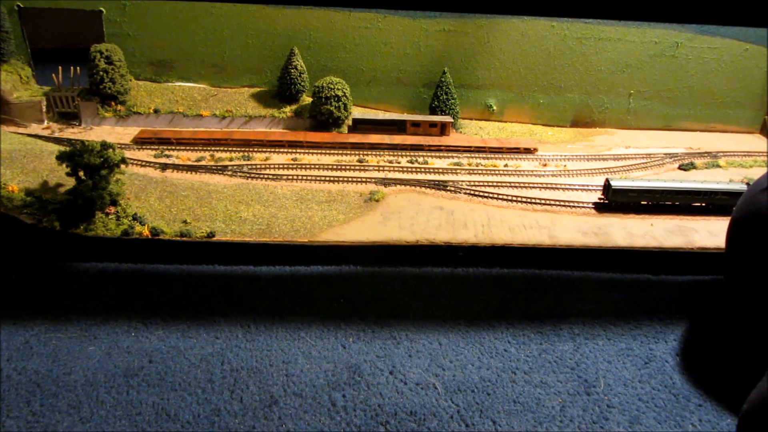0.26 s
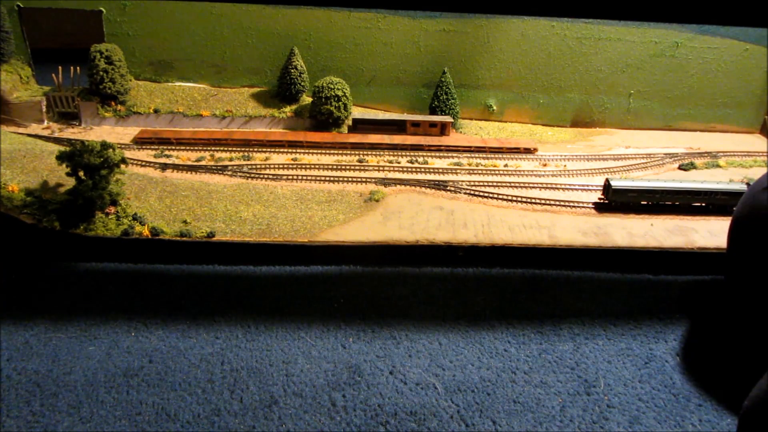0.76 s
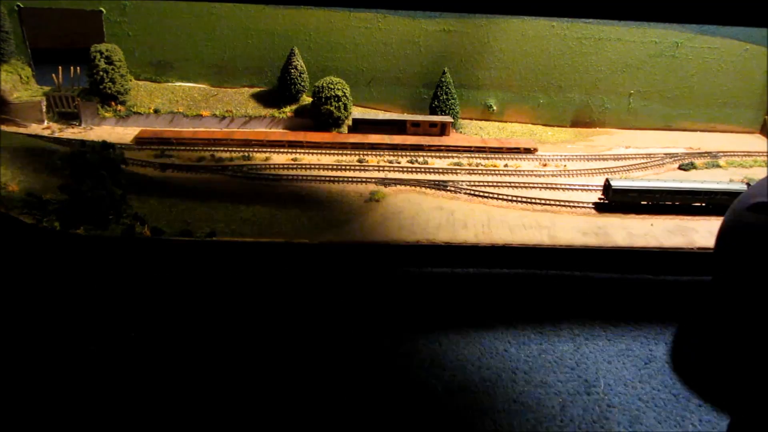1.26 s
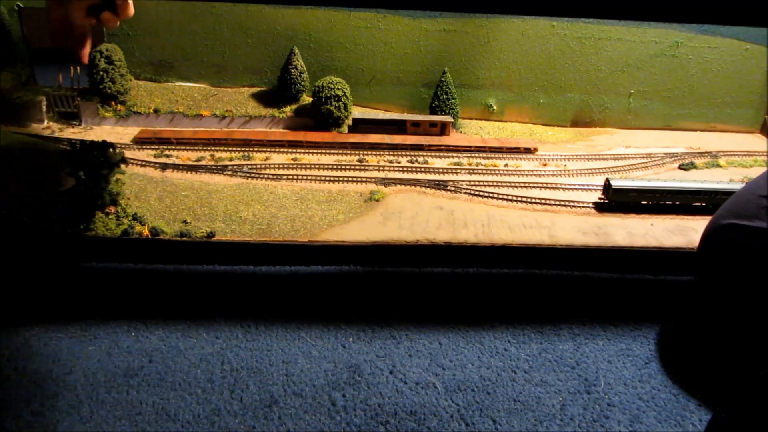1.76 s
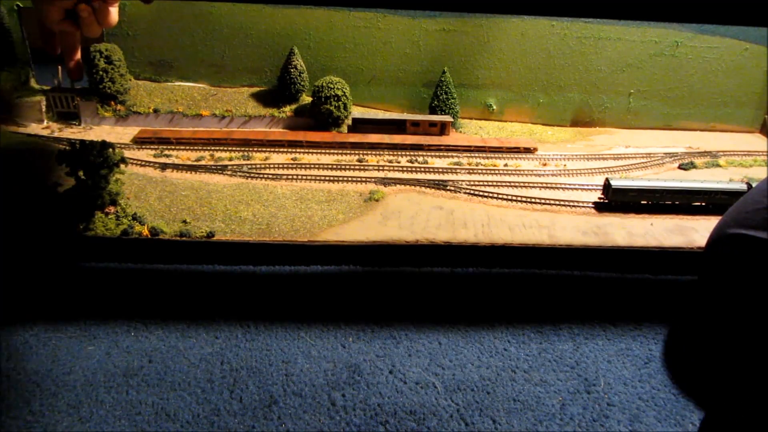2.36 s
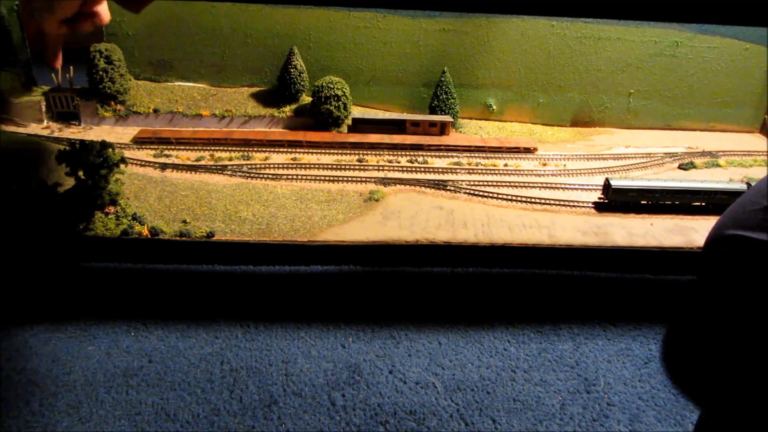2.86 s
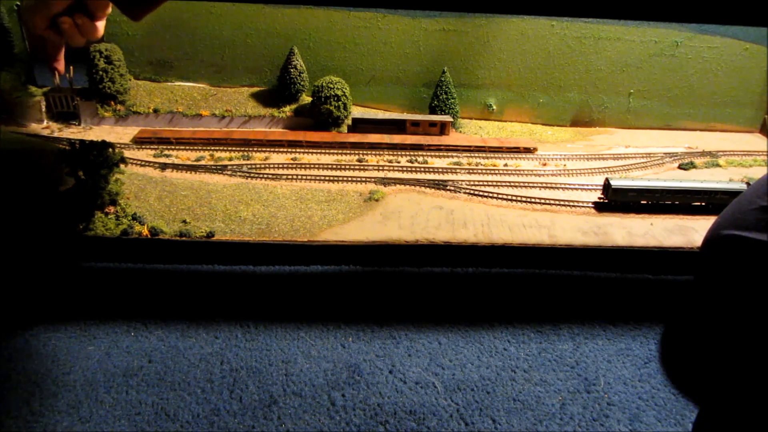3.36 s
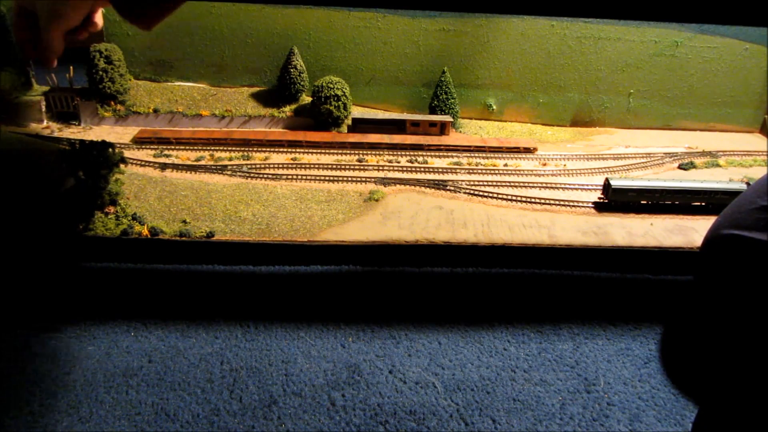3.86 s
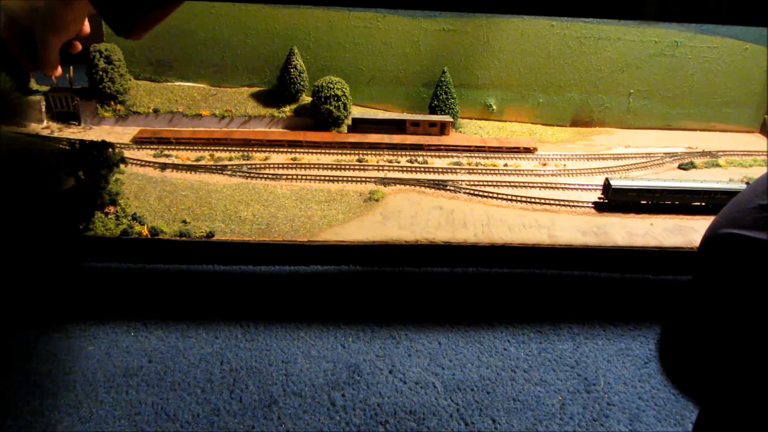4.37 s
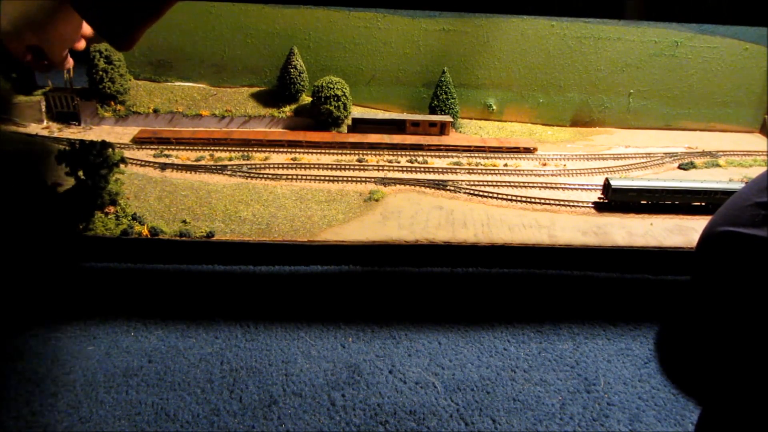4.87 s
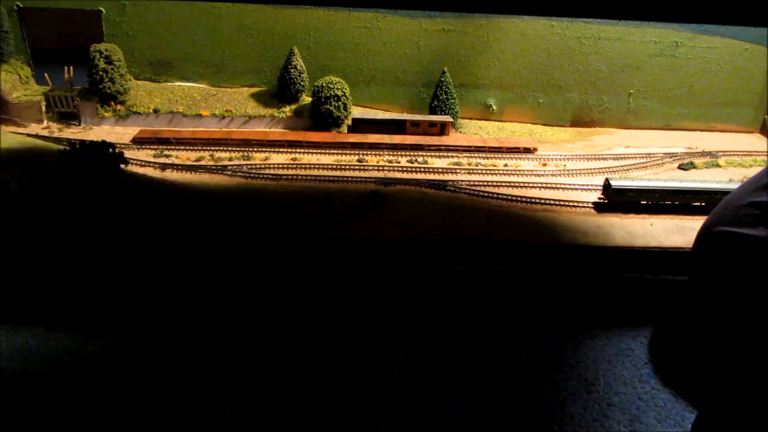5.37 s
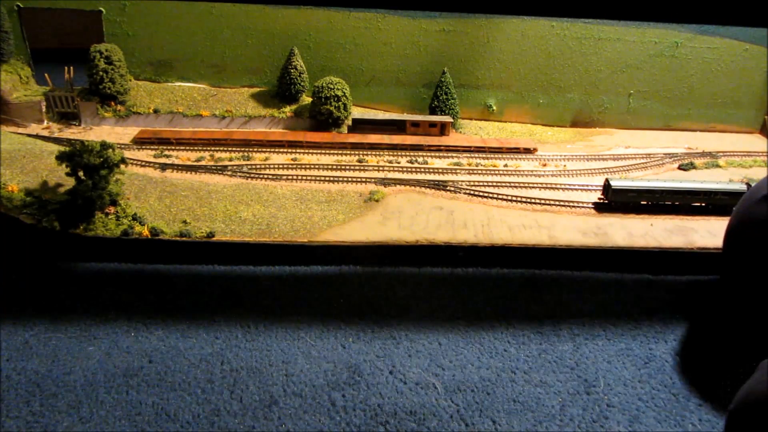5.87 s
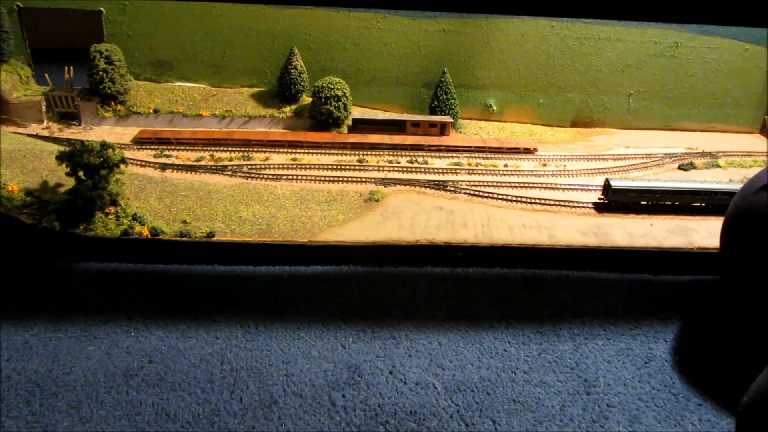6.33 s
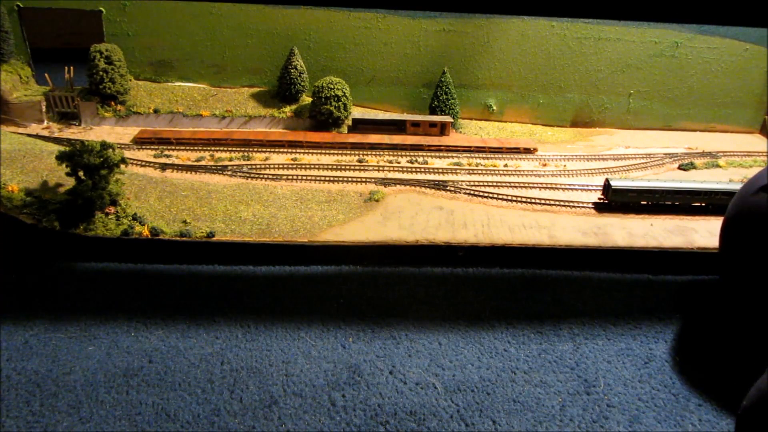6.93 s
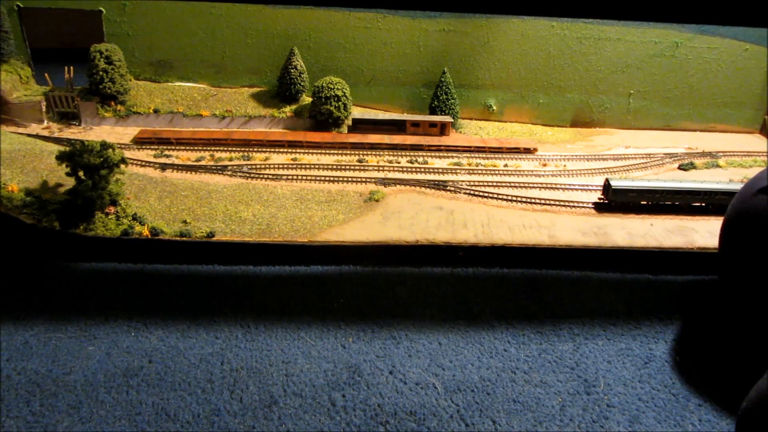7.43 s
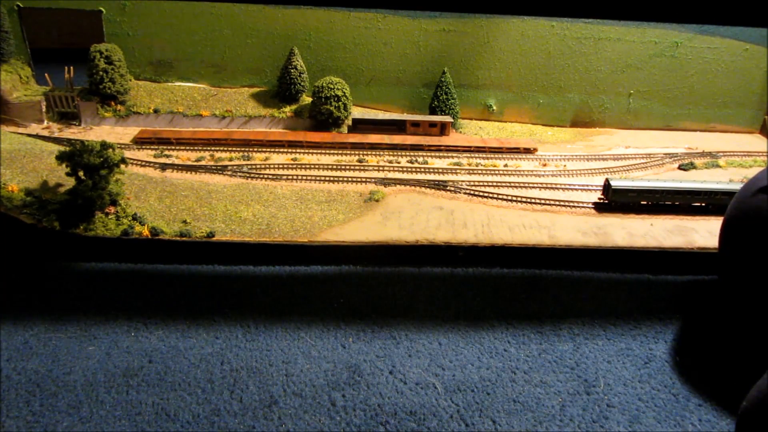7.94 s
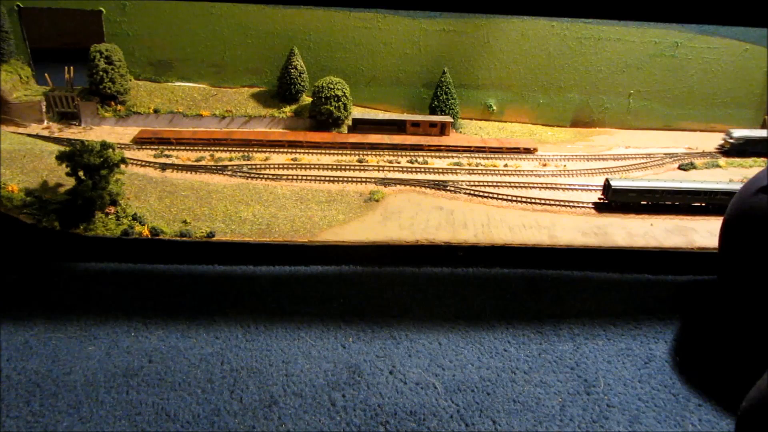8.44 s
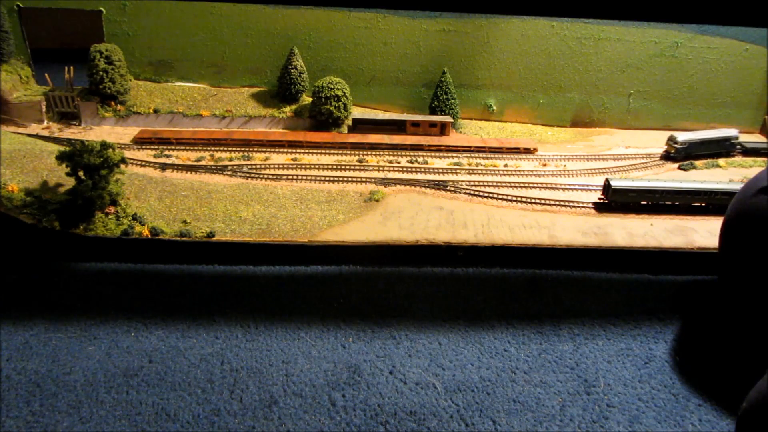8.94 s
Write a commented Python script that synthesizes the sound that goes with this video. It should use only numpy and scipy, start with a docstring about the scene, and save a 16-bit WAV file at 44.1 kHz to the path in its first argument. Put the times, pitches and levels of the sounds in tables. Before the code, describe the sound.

A small model train rolls to a stop, plastic wagons click and scrape on rails, a switch snaps, and the train rattles off again.

```python
"""In a quiet, humming room, a small model train rolls to a stop on a wooden layout. A sleeve rustles as an
arm reaches over, and plastic wagons click and scrape while they are set on the rails at the left. A point
switch snaps, and the train sets off again at the right: the board rumbles, gears whirr, wheels tick over joints.
Impacts excite decaying modes; rolling and friction are trains of random tiny contacts passed through
resonances; hum is a set of sines and hiss is shaped noise. Room reflections follow the handled and moving sources."""
import sys
import numpy as np
from scipy import signal
from scipy.fft import rfft, irfft
from scipy.io import wavfile
from scipy.ndimage import uniform_filter1d, map_coordinates

SR = 44100
rng = np.random.default_rng(int(sys.argv[2]) if len(sys.argv) > 2 else 0)


def transcribe(u):
    """Save the signal u as a 16-bit wav file named by the first command-line argument.

    u: samples, shape (n,) or (channels, n), limited to [-1, 1]; the rate is SR.
    q: integer samples, one column per channel.
    """
    v = np.clip(np.atleast_2d(u).T, -1, 1)
    q = np.round(v * 32767).astype(np.int16)
    wavfile.write(sys.argv[1], SR, q)


N = 405719
T = np.arange(N) / SR
RING_T = T[:8192]  # time axis of short sounds and impulse responses

# Room hiss, spectrum: [f/Hz, level/dB per Hz]
AIR_SPECTRUM = [(25, -14), (50, -11.5), (95, 1.5), (140, 2.5), (280, -1), (450, -4.5), (800, -7.5),
                (1400, -13), (2900, -19), (4100, -26.5), (5600, -23), (8500, -28), (12000, -41),
                (16000, -44)]
# Difference of the hiss between the channels: [f/Hz, side minus mid level/dB]
AIR_SIDE = [(40, 7), (150, 4.5), (300, 4.5), (700, 1), (1500, -1.5), (16000, 0)]
# Mains hum and appliance tones: [f/Hz, rms level/dB]
HUM_TONES = [(100, -81), (119.8, -50), (189.6, -61), (925.9, -74.5)]
AIR_DB = -51.5
ROOM_T60_S, ROOM_TREBLE_T60_S = 0.27, 0.15
SCATTER_DB = -7  # early scatter from scenery and backdrop
PATTERN_S = 0.05  # spacing of the reflection patterns of a moving source
# The backdrop's echo: delay, spread of the delay (share), level before its low-pass
BACKDROP_S, BACKDROP_SPREAD, BACKDROP_DB = 0.0036, 0.15, -7
TOP_HZ = 16000  # edge of the final low-pass

# Sleeve reaching in and drawing back: [t/s, half length/s, rustle level/dB, fibre crackle level/dB]
SLEEVE_STROKES = [(1.506, 0.26, -56.5, -69), (5.351, 0.43, -72, -76.5), (5.973, 0.15, -63, -64),
                  (6.22, 0.2, -62, -70)]
# Sliding cloth, spectrum: [f/Hz, level/dB per Hz]
CLOTH_SPECTRUM = [(300, 0.5), (700, 8), (1300, 0), (2200, 3), (3900, -4.5), (5500, 0.5), (7500, -4),
                  (10000, -42), (15000, -51)]
# Catching fibres, spectrum: [f/Hz, level/dB per Hz]
FIBRE_SPECTRUM = [(3000, -13), (6000, -2.5), (9000, -0.5), (12000, -11.5), (16000, -14)]

# Modes of the wooden baseboard: [f/Hz, level/dB, t60/s]
BOARD_MODES = [(196, -20, 0.15), (279.6, -3, 0.099), (337, -6, 0.086), (406.4, 2, 0.082), (465, 0.5, 0.065),
               (528.6, -0.5, 0.1), (633, -1.5, 0.052), (807, 1.5, 0.045), (922, 0, 0.031), (1153, 2, 0.017),
               (1300, -2, 0.023), (1454, -4, 0.022)]
# Crowded board modes heard as a dry thud: [ratio of f to the board's pitch, level/dB per Hz]
THUD_SPECTRUM = [(0.2, -20), (0.6, 0), (1.2, 0), (2.5, -14), (6, -40)]
# Dull bumps against the board: [t/s, level/dB, f/Hz, t60/s]
BUMPS = [(1.2535, -18, 172.8, 0.035), (1.288, -37, 135, 0.057), (2.138, -22, 332, 0.013),
         (3.146, -47.5, 473, 0.14), (3.716, -37, 585, 0.11), (4.108, -33, 194, 0.051),
         (4.898, -30.5, 604, 0.035), (4.905, -35, 230, 0.052), (7.152, -32, 570, 0.036),
         (7.818, -27, 283, 0.035), (7.9405, -22, 525, 0.025), (9.0334, -16.5, 374, 0.018)]

# Modes of a plastic wagon shell: [f/Hz, level/dB, t60/s]
WAGON_MODES = [(1542, 2, 0.052), (1765, -1.5, 0.024), (1960, 1, 0.031), (2158, 2, 0.036), (2375, 4, 0.032),
               (2424, -3, 0.02), (2685, -1.5, 0.03), (3025, 5.5, 0.026)]
# Sharp edge of a hard contact, spectrum: [f/Hz, level/dB per Hz]
TICK_SPECTRUM = [(800, -4), (2800, 6), (4500, 1), (7000, 4), (9000, -8), (12000, -20.5), (16000, -31)]
# How each kind of contact shares its strength (bodies knock, a hook snaps, a wheel drops or crosses a joint):
# kind: [wagon level/dB, board level/dB, tick level/dB, shift of the board's pitch/octaves]
CONTACT_SHARES = {"knock": (0, -8, -13.5, 1.05), "hook": (0, -9.5, -0.5, 0.6),
                  "drop": (-5.5, 0.5, -3.5, 0.1), "joint": (-15.5, -2.5, -4, 0.37)}
# Wagons being handled:
# [t/s, level/dB, wagon f/Hz, extra tick level/dB, tilt of the tick's top/dB per octave, kind]
WAGON_CLICKS = [(2.0632, -56, 1550, 0, 0, "knock"), (2.1136, -53, 2150, -2, -5, "drop"),
                (2.2495, -38, 1620, -2, 3, "hook"), (2.266, -43.5, 2920, -3.5, 15, "hook"),
                (2.2795, -47.5, 1980, 0, 4, "drop"), (2.4643, -39.5, 2320, 2.5, 5.5, "hook"),
                (2.5905, -36, 1970, -3, -9, "knock"), (2.7307, -47, 1690, 9, -11, "knock"),
                (2.9716, -46, 2460, 1, 6, "knock"), (3.241, -47, 2270, -7, 0, "knock"),
                (3.257, -32.5, 2220, 1, 4, "knock"), (3.2714, -32, 1950, 0, 1, "knock"),
                (3.6272, -47.5, 1440, 1, -4, "drop"), (3.6428, -48.5, 1690, 5.5, 3, "hook"),
                (3.653, -50, 1500, 11, 5, "drop"), (3.7125, -32, 2470, 2, -5, "drop"),
                (3.7141, -35.5, 2480, -11, -2, "knock"), (3.8003, -38.5, 2250, -6, -4, "knock"),
                (3.8658, -42.5, 2400, -15, 0, "knock"), (4.1066, -27, 1440, -0.5, -8, "drop"),
                (4.4153, -41.5, 2700, -1.5, -5, "drop"), (4.4674, -47, 1960, 1.5, 4, "hook"),
                (4.8963, -39, 2930, 0, 3, "drop"), (4.9032, -42.5, 1390, -1.5, -2, "drop"),
                (5.027, -42, 2500, 1.5, 0, "knock")]
# Wheels nudged along the rail: [t/s, half length/s, wagon level/dB, board level/dB]
SCRAPES = [(2.026, 0.019, -56, -62), (2.295, 0.018, -55, -52), (2.963, 0.02, -53, -62),
           (3.103, 0.035, -51.5, -55), (3.141, 0.0052, -50, -54), (3.541, 0.05, -54, -50),
           (3.683, 0.042, -46.5, -46.5)]
# Brief ringing of a coupling hook or rail end: [t/s, level/dB, f/Hz, t60/s]
PINGS = [(4.4674, -51, 4780, 0.022), (4.8975, -49, 3060, 0.03)]
WAGON_HZ, WAGON_STRETCH = 2100, 0.19  # usual wagon pitch; exponent by which another shell moves its modes
# A stronger click reaches higher board modes: pitch at a usual level, and the dB that raise it an octave
CLICK_BOARD_HZ, USUAL_CLICK_DB, DB_PER_OCTAVE = 660, -39.5, 21

# Point switch lets go, bounces, hits its stop and bounces again: [t/s, level/dB, decay of the contact/s]
SNAPS = [(7.114, -35.5, 0.0029), (7.1245, -35.5, 0.0082), (7.149, -26.5, 0.0018), (7.1593, -29.5, 0.0036)]
# Switch blow, spectrum: [f/Hz, level/dB per Hz]
SNAP_SPECTRUM = [(30, -34), (120, -14), (280, -9), (450, 0), (600, 1.5), (1000, -2), (1300, 0), (1750, -5),
                 (2100, -1), (2550, -1), (3300, -8), (4300, -11), (6400, -10), (8500, -20), (12000, -27),
                 (16000, -36)]
# Modes of the switch's spring: [f/Hz, level/dB, t60/s]
SPRING_MODES = [(2120, -5, 0.17), (2390, 0, 0.27), (2570, 2, 0.2), (2800, -3, 0.22), (3180, -6, 0.15)]
SNAP_TICK_DB = -17  # the metal armature meeting its stop
SPRING_DB, SNAP_BOARD_DB = -14, -13.5  # how strongly each blow rings the spring and the board
# The linkage rattles on: start, mean spacing, first level, loss each time, bass edge
RATTLE_S, REBOUND_S, REBOUND_DB, REBOUND_LOSS_DB, REBOUND_LOW_HZ = 7.167, 0.0085, -32.5, 3, 300

# Train brakes, all but stands, creeps off and gathers speed: [t/s, share of full speed]
SPEED = [(0.25, 1), (0.41, .52), (0.53, .36), (0.6, 0), (7.54, 0.062), (7.58, .28), (7.76, .42),
         (8.01, 0.96)]
# Board rumble, gear whirr, wheel hiss, in that order:
# [level at full speed/dB, power of speed, fade when coasting/dB per s]
ROLLING = [(-34.5, 2.76, 9), (-45.5, 1.23, 26), (-43, 1.15, 16)]
# Modes of the locomotive's gear case: [f/Hz, level/dB, t60/s]
GEARCASE_MODES = [(1520, -5, 0.0064), (1870, -7.5, 0.014), (2180, -2.5, 0.012), (2330, -2.5, 0.012),
                  (2970, 3, 0.014), (3250, 5.5, 0.0033)]
# Modes of the motor's frame: [f/Hz, level/dB, t60/s]
MOTOR_MODES = [(2980, -4.5, 0.0058), (3369, -2, 0.013), (3498, -3.5, 0.014)]
# Rolling wheels, spectrum: [f/Hz, level/dB per Hz]
WHEEL_HISS_SPECTRUM = [(1500, 5.5), (3000, 5.5), (4100, 0), (5400, 2.5), (6600, 1.5), (8300, 0),
                       (9100, -1.5), (9800, -5.5), (11000, -8.5), (12200, -18), (16000, -20)]
# Wheels sliding on the rail, spectrum: [f/Hz, level/dB per Hz]
SKID_SPECTRUM = [(3500, -35), (5000, 0), (6600, 6), (8000, -10), (12000, -30)]
# Loudest contacts of the running train:
# [t/s, level/dB, wagon f/Hz, extra tick level/dB, tilt of the tick's top/dB per octave, kind]
TRAIN_CLACKS = [(0.023, -40.5, 2900, 2.5, 5, "joint"), (0.353, -39, 3400, -6, 4, "joint"),
                (0.4877, -48.5, 2700, 0, 6, "hook"), (7.5612, -48, 2460, 10, -16, "knock"),
                (8.2862, -43.5, 2750, 5.5, -1, "joint"), (8.3394, -36, 2860, 0.5, 2, "joint"),
                (8.492, -30.5, 1440, 0.5, 6, "joint"), (8.6134, -30, 1460, -1, 9, "joint"),
                (8.7218, -36, 2400, 6.5, 2, "joint"), (8.731, -41, 2400, 6.5, 7, "joint"),
                (8.7561, -32, 2100, -3.5, 2, "joint"), (8.8104, -43, 2100, 4, 10, "joint"),
                (8.8584, -37.5, 2890, 0.5, 2, "joint"), (8.8831, -41, 1260, 11, 4, "knock"),
                (8.8992, -33, 1420, -0.5, 2, "joint"), (8.9194, -43, 2080, 12, 4, "knock"),
                (8.946, -37, 2180, 3, 3, "joint"), (8.995, -35.5, 2280, -5, 4, "joint"),
                (9.0341, -32, 2020, 5, 13, "knock"), (9.0756, -46.5, 1410, 8.5, 8, "hook"),
                (9.092, -44, 1900, 4, 2, "knock"), (9.1186, -42, 2260, 2.5, 5, "hook"),
                (9.187, -39, 1770, 3, 9, "joint")]
POINTS_S, POINTS_HALF_S, POINTS_DB = 8.6, 0.16, 4  # the rougher track over the points
COAST_S = 8.7  # the throttle is eased
TRACK_HZ = 424  # where the board answers under the train
MOTOR_DB, MOTOR_HZ, MOTOR_POWER = -50.5, 61.4, 0.84  # level at full speed, turns per s, power of speed
# Lesser joints at full speed: board level, its greatest rise, tick and wagon relative to the board
JOINT_DB, JOINT_SPREAD_DB, JOINT_TICK_DB, JOINT_WAGON_DB = -44, 3, -5, -13
CHATTER_DB, CHATTER_POINTS_DB = -51, 4.5  # ticks of loose axles at full speed; their rise over the points
CHATTER_PER_S, CHATTER_SPREAD_DB = 130, 1.9
SPREAD_HISS_DB = -2  # wheel hiss from all along the train, different in each channel
# The train arrives over a hollow span of the board: centre, half length, boom at full speed, pitch
HOLLOW_S, HOLLOW_HALF_S, HOLLOW_DB, HOLLOW_HZ = 0.16, 0.31, -39.5, 330


def undb(db):
    """Level definition: decibels to amplitude ratio."""
    return np.exp(np.asarray(db) * (np.log(10) / 20))


def unit(x):
    """Normalisation of mean power: scale to rms 1."""
    return x / np.sqrt(np.mean(x ** 2))


def blow(x):
    """Normalisation of energy: an impact's energy, spread over 20 ms, has rms 1."""
    return x / np.sqrt(np.sum(x ** 2) / (.02 * SR))


def add(track, s, x):
    """Superposition: mix a short sound into a track at time s."""
    i = int(s * SR)
    track[..., i:i + x.shape[-1]] += x[..., :N - i]


def through(x, response):
    """Linear filtering: convolve a sound with an impulse response."""
    return signal.oaconvolve(x, response)[:len(x)]


def above(x, hz):
    """Second-order high-pass: thin out what lies below hz."""
    return signal.sosfilt(signal.butter(2, hz, "high", fs=SR, output="sos"), x)


def swell(s, half_s):
    """Gaussian envelope: a smooth rise and fall around time s."""
    return np.exp(-np.minimum(((T - s) / half_s) ** 2, 20))


def colour(points):
    """Minimum-phase principle: a causal impulse response from a spectrum, by folding the cepstrum."""
    hz, db = np.transpose(points)
    size = len(RING_T)
    f = np.fft.rfftfreq(size, 1 / SR)
    level_db = np.interp(np.log(f + 1), np.log(hz), db)
    cepstrum = irfft(np.log(undb(level_db)))
    fold = 1 + np.sign(size / 2 - np.arange(size))
    fold[0] = 1
    return irfft(np.exp(rfft(cepstrum * fold)))


def ring(modes, scatter_db=0, detune=0, damping=1):
    """Modal superposition: decaying modes, neighbours in opposite phase, strengths varied by the spot struck."""
    hz, db, t60 = np.transpose(modes)[:, :, None]
    size, shift = rng.standard_normal((2, len(modes), 1))
    sign = (-1) ** np.arange(len(modes))[:, None]
    fade = np.exp(-np.log(1000) * damping * RING_T / t60)
    swing = np.sin(2 * np.pi * hz * (1 + detune * shift) * RING_T)
    return np.sum(sign * undb(db + scatter_db * size) * fade * swing, axis=0)


def near(modes, centre_hz, slope_db):
    """Selective excitation: modes reached from one spot, weaker by slope_db an octave away from centre_hz."""
    return [(hz, db - slope_db * abs(np.log2(hz / centre_hz)), t60) for hz, db, t60 in modes]


def walk(rate):
    """Low-pass randomness: a smooth drift with a spread near 1."""
    k = int(SR / rate)
    steps = rng.standard_normal(2048)[np.arange(N) // k]
    return 1.3 * uniform_filter1d(uniform_filter1d(steps, k), k)


def grains(per_s, spread_db):
    """Shot process: tiny contacts at random moments, a few much stronger than the rest."""
    excess_db = spread_db * np.minimum(rng.exponential(size=N), 5)
    size = undb(excess_db) * rng.choice([-1, 1], N)
    return size * (rng.random(N) < per_s / SR)


def reflections(x, room_db):
    """Diffuse reverberation: early scatter from the scenery and an exponential tail from the room."""
    t = T[:2 * len(RING_T)]
    noise = rng.standard_normal((2, len(t)))
    low = signal.sosfilt(signal.butter(1, 2500, fs=SR, output="sos"), noise)
    # the treble of the room dies first
    bass_tail = low * np.exp(-np.log(1000) * t / ROOM_T60_S)
    tail = bass_tail + (noise - low) * np.exp(-np.log(1000) * t / ROOM_TREBLE_T60_S)
    # scenery and backdrop scatter the treble within the first milliseconds
    scatter = t * np.exp(-t / .0012) * above(rng.standard_normal(noise.shape), hz=4500)
    out = []
    for late, early in zip(tail, scatter):
        late_part = undb(room_db) * late / np.linalg.norm(late)
        early_part = undb(SCATTER_DB) * early / np.linalg.norm(early)
        out.append(through(x, late_part + early_part))
    return np.array(out)


def passing_reflections(x, room_db):
    """Changing paths: a moving source meets overlapping new patterns of reflections."""
    hop, out = int(PATTERN_S * SR), np.zeros((2, N))
    for start in range(-hop, N, hop):
        i = np.arange(max(start, 0), min(start + 2 * hop, N))
        piece = x[i] * np.sin(np.pi * (i - start) / (2 * hop))
        if np.abs(piece).max() > 1e-5:  # skip silence
            add(out, i[0] / SR, reflections(np.pad(piece, (0, len(RING_T))), room_db))
    return out


def place(x, lag_ms, pan_db, room_db, moving=False):
    """Time and level differences: direct sound is lag_ms later at the left; reflections are added."""
    room = passing_reflections(x, room_db) if moving else reflections(x, room_db)
    late = map_coordinates(x, [(T[:len(x)] - lag_ms / 1000) * SR])  # fractional delay
    return np.array([late * undb(pan_db / 2), x * undb(-pan_db / 2)]) + room


def backdrop(x):
    """Single reflection: a click and its duller echo from the wall just behind the track."""
    delay = int(BACKDROP_S * (1 + BACKDROP_SPREAD * rng.uniform(-1, 1)) * SR)
    echo = signal.sosfilt(signal.butter(1, 4000, fs=SR, output="sos"), x)
    return x + undb(BACKDROP_DB) * np.pad(echo, (delay, 0))[:len(x)]


def crack(points, rise_s, decay_s):
    """Impulsive noise: a brief chatter between two hard surfaces."""
    envelope = (1 - np.exp(-RING_T / rise_s)) * np.exp(-RING_T / decay_s)
    push = rng.standard_normal(len(RING_T)) * envelope
    return blow(through(push, colour(points)))


def tick(tilt_db):
    """Contact stiffness: a harder edge has more top, by tilt_db an octave above 6 kHz."""
    points = [(hz, db + tilt_db * max(np.log2(hz / 6000), 0)) for hz, db in TICK_SPECTRUM]
    return crack(points, rise_s=0.00021, decay_s=0.00084)


def strike(wagon_db, wagon_hz, board_db, board_hz, tick_db, tilt_db):
    """Coupled impact: a tick, the wagon's shell and the board beneath, which half rings and half thuds."""
    reached = near(BOARD_MODES, board_hz, slope_db=2.0)
    modes = above(ring(reached, scatter_db=1.5, detune=0.05, damping=2.25), 0.69 * board_hz)
    thud_points = [(ratio * board_hz, db) for ratio, db in THUD_SPECTRUM]
    thud = crack(thud_points, rise_s=0.00033, decay_s=0.003)
    board = blow(blow(modes) + thud)
    stretch = (wagon_hz / WAGON_HZ) ** WAGON_STRETCH
    shell = [(hz * stretch, db, t60) for hz, db, t60 in WAGON_MODES]
    wagon = blow(ring(near(shell, wagon_hz, slope_db=21), scatter_db=1.4, detune=0.016, damping=1.3))
    edge = above(tick(tilt_db), hz=380)
    return undb(board_db) * board + undb(wagon_db) * wagon + undb(tick_db) * edge


def contact(kind, db, wagon_hz, board_hz, extra_tick_db, tilt_db):
    """Energy partition: a strike shared between wagon, board and tick according to its kind."""
    wagon_db, board_db, tick_db, octaves = CONTACT_SHARES[kind]
    shifted_hz = board_hz * 2 ** octaves
    return strike(db + wagon_db, wagon_hz, db + board_db, shifted_hz, db + tick_db + extra_tick_db, tilt_db)


def room_tone():
    """Stationary background: steady hum over soft hiss, whose bass differs more between the channels."""
    mid, side = (unit(through(rng.standard_normal(N), colour(AIR_SPECTRUM))) for _ in range(2))
    air = mid + np.array([[1], [-1]]) * through(side, colour(AIR_SIDE))
    hum = np.zeros(N)
    for hz, db in HUM_TONES:
        amplitude = undb(db + 0.094 * walk(5.5)) * np.sqrt(2)
        hum += amplitude * np.sin(2 * np.pi * hz * T + 0.042 * walk(1.9))
    return undb(AIR_DB + 0.11 * walk(2.97)) * air + hum


def sleeve():
    """Friction of cloth on cloth: fibres catch and let go; each stroke swells, brighter as it quickens."""
    rustle = sum(undb(db) * swell(s, half_s) for s, half_s, db, _ in SLEEVE_STROKES)
    crackle = sum(undb(db) * swell(s, half_s) for s, half_s, _, db in SLEEVE_STROKES)
    slide = unit(through(grains(9000, 0.64), colour(CLOTH_SPECTRUM)))
    fibres = unit(through(grains(3700, 2.9), colour(FIBRE_SPECTRUM)))
    pace = walk(14)
    strokes = undb(.5 * pace) * rustle * slide + undb(2 * pace) * crackle * fibres
    cloth = undb(1.0 * walk(30)) * strokes
    return place(cloth, lag_ms=0, pan_db=-19.0, room_db=7.0, moving=True)


def bumps():
    """Soft impact: a damped oscillation rocks the board for a few cycles and faintly rings its modes."""
    out = np.zeros(N)
    for s, db, hz, t60 in BUMPS:
        envelope = np.exp(-np.log(1000) * RING_T / t60) * (1 - np.exp(-RING_T / 0.0033))
        swing = np.sin(2 * np.pi * hz * RING_T) * envelope
        add(out, s, undb(db) * (2.48 * swing + undb(-23.0) * blow(ring(BOARD_MODES, damping=1.5))))
    return place(above(out, hz=69.4), lag_ms=0, pan_db=-1.0, room_db=-9)


def handling():
    """Friction-excited modes: wagons scrape as they are nudged along the rail; now and then a hook rings."""
    pings = np.zeros(N)
    for s, db, hz, t60 in PINGS:
        add(pings, s, undb(db) * blow(ring([(hz, 0, t60)])))
    on_wagon = sum(undb(db) * swell(s, half_s) for s, half_s, db, _ in SCRAPES)
    on_board = sum(undb(db) * swell(s, half_s) for s, half_s, _, db in SCRAPES)
    rub = grains(1500, 3.9)
    wagon = unit(through(rub, ring(near(WAGON_MODES, 2350, slope_db=4), damping=1.3)))
    board = unit(through(rub, ring(near(BOARD_MODES, 710, slope_db=13.5))))
    scrape = on_wagon * wagon + on_board * board
    return place(pings + scrape, lag_ms=-0.057, pan_db=3.0, room_db=-6.5)


def clicks():
    """Impact of wagons on rails and each other: every spot rings differently, and the board murmurs beneath."""
    out = np.zeros((2, N))
    for s, db, wagon_hz, extra_tick_db, tilt_db, kind in WAGON_CLICKS:
        board_hz = CLICK_BOARD_HZ * 2 ** ((db - USUAL_CLICK_DB) / DB_PER_OCTAVE)
        hit = contact(kind, db, wagon_hz, board_hz, extra_tick_db, tilt_db)
        add(out, s, place(backdrop(hit), lag_ms=-0.074, pan_db=0.8, room_db=-9.5))
    return out


def snap(db, decay_s):
    """Impact on a spring: a crack and a tick ring the switch's spring and the board it is screwed to."""
    spring = undb(SPRING_DB) * blow(ring(SPRING_MODES, scatter_db=1.0, detune=0.0202))
    reached = near(BOARD_MODES, 450, slope_db=5)
    board = undb(SNAP_BOARD_DB) * blow(ring(reached, scatter_db=3.0, detune=0.04, damping=1.5))
    burst = crack(SNAP_SPECTRUM, rise_s=0.00045, decay_s=decay_s)
    return undb(db) * (burst + undb(SNAP_TICK_DB) * tick(tilt_db=-5) + spring + board)


def switch(count=7):
    """Repeated rebound: the point switch snaps over, its linkage rattles unevenly; the room carries much of it."""
    hits = [(s, snap(db, decay_s)) for s, db, decay_s in SNAPS]
    for k, (early, size) in enumerate(rng.uniform(-1, 1, (count, 2))):
        hit = snap(REBOUND_DB - REBOUND_LOSS_DB * k + 2 * size, decay_s=0.0026)
        hits.append((RATTLE_S + (k + early / 3) * REBOUND_S, above(hit, REBOUND_LOW_HZ)))
    out = np.zeros((2, N))
    for s, hit in hits:
        add(out, s, place(np.pad(hit, (0, len(RING_T))), lag_ms=0.095, pan_db=-4.5, room_db=-0.5))
    return out


def clacks():
    """Impact excitation by the train: its loudest contacts, each with its own pattern of reflections."""
    out = np.zeros((2, N))
    for s, db, wagon_hz, extra_tick_db, tilt_db, kind in TRAIN_CLACKS:
        hit = contact(kind, db, wagon_hz, TRACK_HZ, extra_tick_db, tilt_db)
        add(out, s, place(backdrop(hit), lag_ms=0.079, pan_db=-4.5, room_db=-8.0))
    return out


def lesser_joints(speed, count):
    """Impacts spaced by distance: wheels thud over joints at random places along the way, harder at speed."""
    out, way = np.zeros(N), np.cumsum(speed) / np.sum(speed)
    for k, (where, size, spot) in enumerate(rng.uniform(-0.9, 1, (count, 3))):
        s = np.interp((k + .5 + where / 2) / count, way, T)
        db = JOINT_DB + JOINT_SPREAD_DB * size
        board_hz = TRACK_HZ * 2 ** (spot / 2)
        add(out, s, strike(db + JOINT_WAGON_DB, 2900, db, board_hz, db + JOINT_TICK_DB, tilt_db=1))
    return speed ** 2 * out


def rolling_gains(speed):
    """Power laws of speed: rumble, whirr and hiss swell over the points and fade as the train coasts."""
    points_db = POINTS_DB * swell(POINTS_S, POINTS_HALF_S)
    coasted = np.maximum(T - COAST_S, 0)
    return [undb(db + points_db - fade_db * coasted) * speed ** power for db, power, fade_db in ROLLING]


def train():
    """Roughness excitation: wheels drum on the board, the motor buzzes, gears rattle, flanges hiss and tick."""
    speed = np.interp(T, *np.transpose(SPEED))
    rumble, whirr, hiss = rolling_gains(speed)
    # loose axles drop and catch: each small jolt briefly roughens board, gears, wheels and motor
    drops = through(np.abs(grains(per_s=120, spread_db=2.0)), np.exp(-RING_T / .0025))
    jolt = unit(undb(.7 * walk(45)) * (1 + .6 * drops))
    surge = undb(.9 * walk(22)) * jolt ** .33
    # the gear teeth rattle most once a turn
    turns = np.cumsum(MOTOR_HZ * (1 + 0.034 * walk(5.7))) / SR
    mesh = 1 + 0.21 * np.cos(2 * np.pi * turns)
    board = unit(through(surge * grains(6000, 0.89), ring(BOARD_MODES)))
    gears = unit(through(jolt * mesh * grains(4000, 0.95), ring(GEARCASE_MODES)))
    wheels, left, right = (
        unit(through(jolt * grains(12000, 4.0), colour(WHEEL_HISS_SPECTRUM))) for _ in range(3))
    # the brushes buzz even at a crawl
    buzz = unit(through(jolt * mesh * grains(5000, 0.7), ring(MOTOR_MODES)))
    motor = undb(MOTOR_DB) * speed ** MOTOR_POWER * buzz
    # loose axles chatter, most of all over the points
    chatter_db = CHATTER_DB + CHATTER_POINTS_DB * swell(POINTS_S, POINTS_HALF_S)
    axle_ticks = unit(through(grains(CHATTER_PER_S, CHATTER_SPREAD_DB), colour(TICK_SPECTRUM)))
    chatter = undb(chatter_db) * speed ** 2 * axle_ticks
    hollow_modes = near(BOARD_MODES, HOLLOW_HZ, slope_db=11)
    hollow = unit(through(surge * grains(5000, 0.9), ring(hollow_modes, damping=1.7)))
    boom = undb(HOLLOW_DB) * swell(HOLLOW_S, HOLLOW_HALF_S) * speed ** 2 * hollow
    rolling = rumble * board + boom + whirr * gears + hiss * wheels + motor + chatter
    # the wheels slide the last millimetres before they stand
    slide = unit(through(rng.standard_normal(N), colour(SKID_SPECTRUM)))
    skid = undb(-42.0) * swell(0.532, 0.022) * slide
    joints = lesser_joints(speed, count=16)
    along_train = undb(SPREAD_HISS_DB) * hiss * above(np.array([left, right]), hz=1200)
    # the thin board radiates little bass
    radiated = above(rolling + skid + joints, hz=152)
    return place(radiated, lag_ms=0.078, pan_db=-3.5, room_db=-8.0, moving=True) + along_train


def scene():
    """Superposition of everything on and around the layout."""
    return room_tone() + sleeve() + bumps() + handling() + clicks() + switch() + clacks() + train()


def record(dry):
    """Band limitation: a steep elliptic low-pass cuts the top of the treble."""
    return signal.sosfilt(signal.ellip(10, .2, 70, TOP_HZ, fs=SR, output="sos"), dry)


dry = scene()
out = record(dry)
transcribe(out)
```